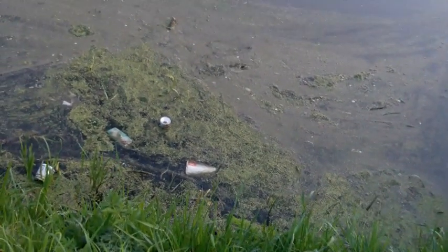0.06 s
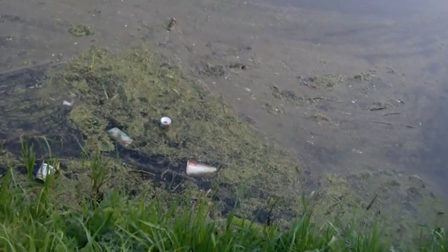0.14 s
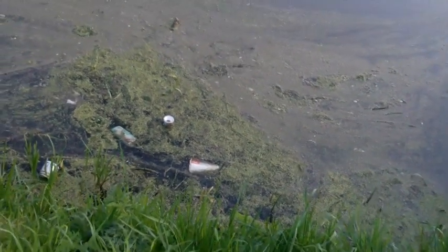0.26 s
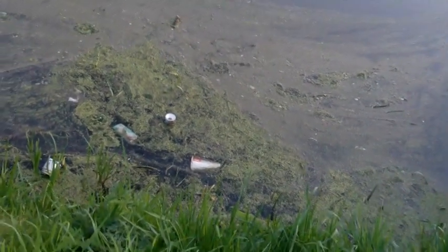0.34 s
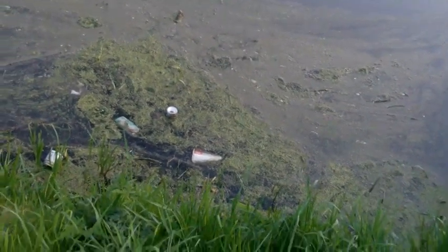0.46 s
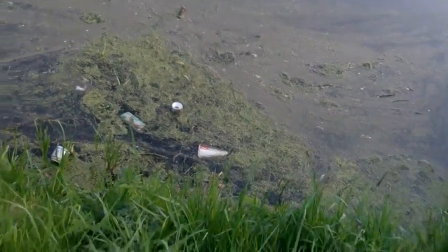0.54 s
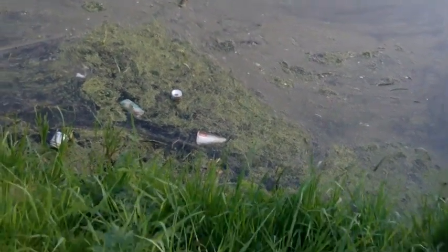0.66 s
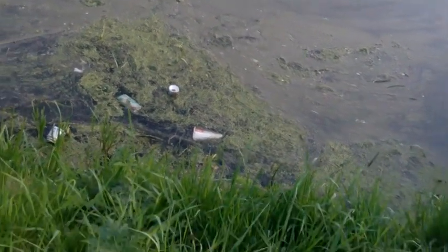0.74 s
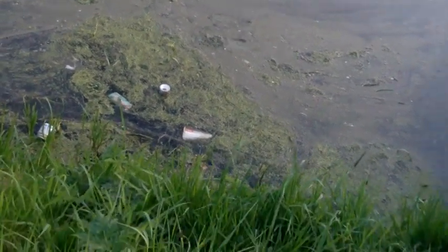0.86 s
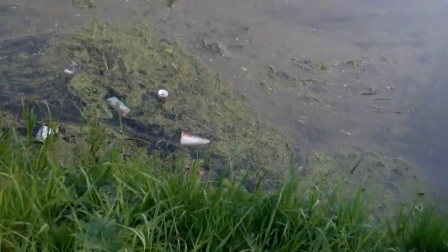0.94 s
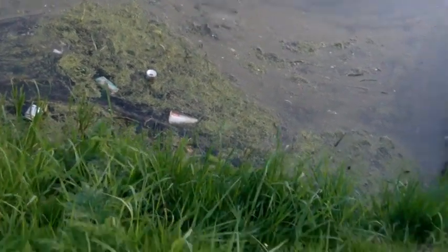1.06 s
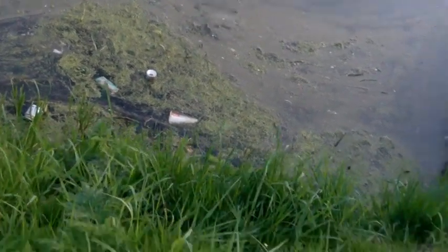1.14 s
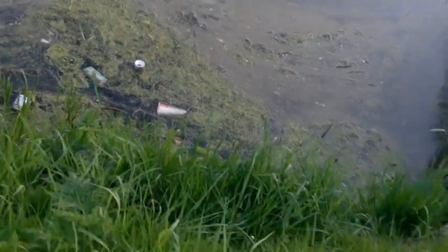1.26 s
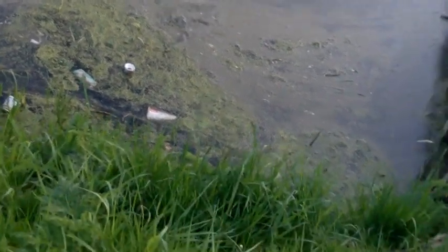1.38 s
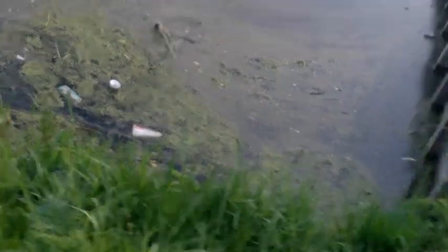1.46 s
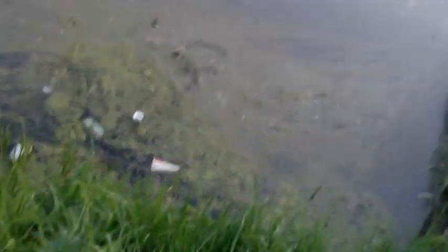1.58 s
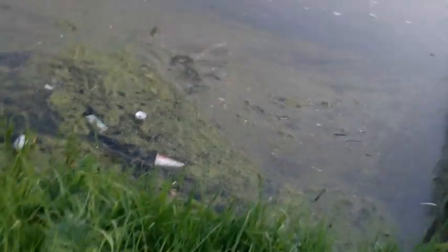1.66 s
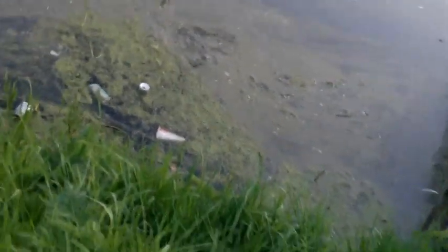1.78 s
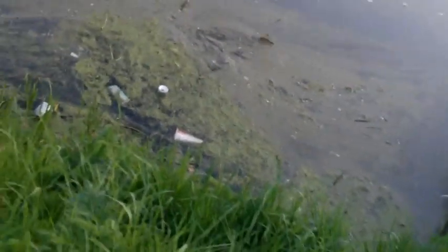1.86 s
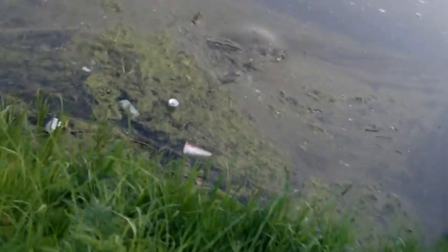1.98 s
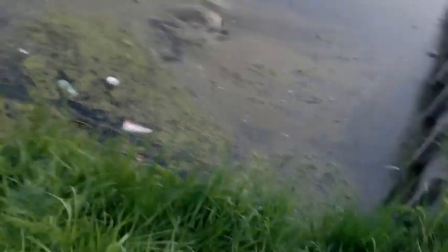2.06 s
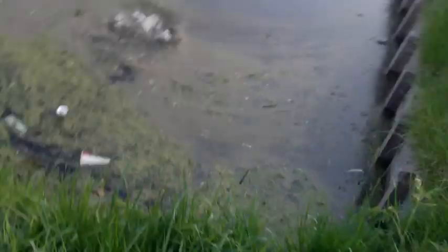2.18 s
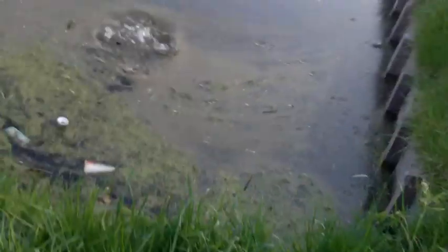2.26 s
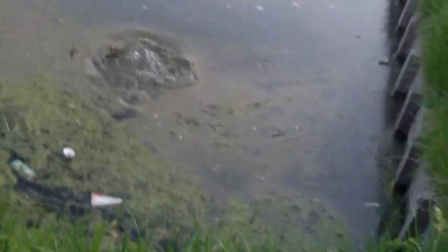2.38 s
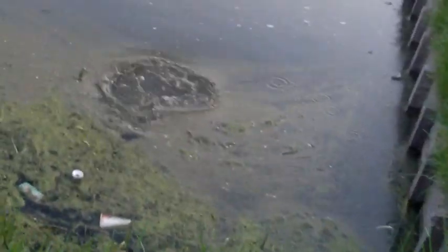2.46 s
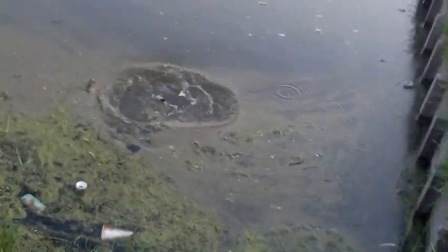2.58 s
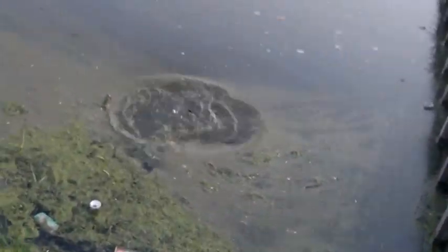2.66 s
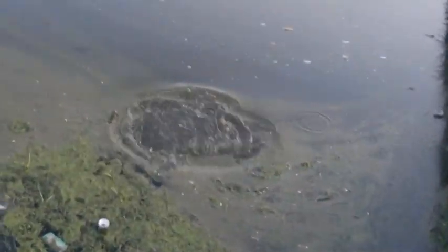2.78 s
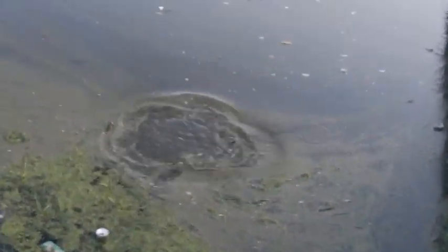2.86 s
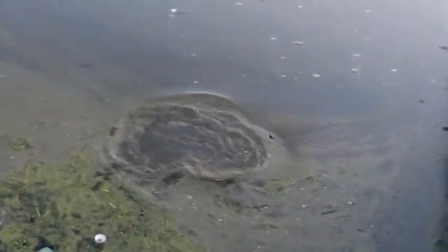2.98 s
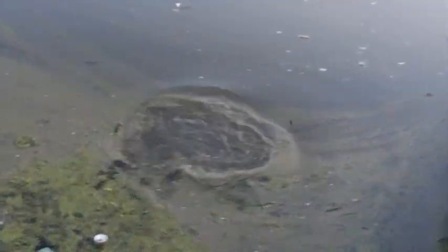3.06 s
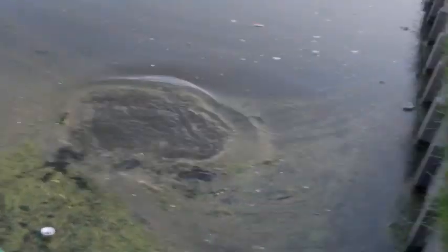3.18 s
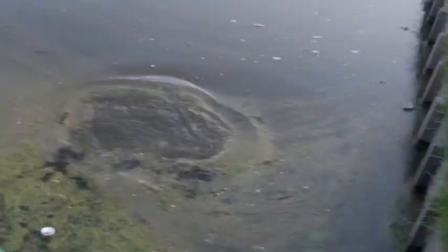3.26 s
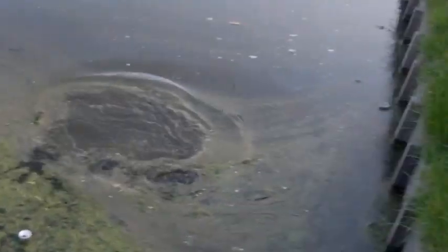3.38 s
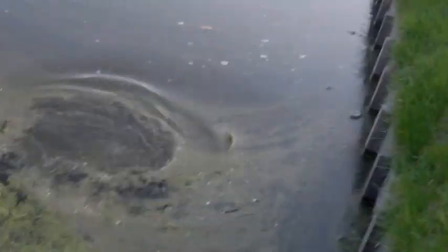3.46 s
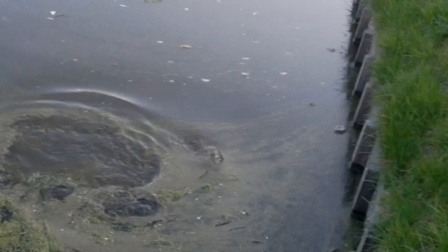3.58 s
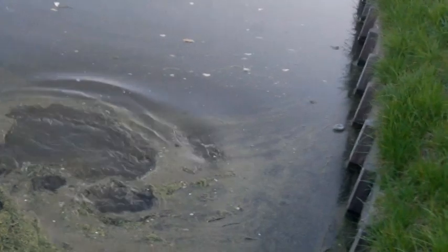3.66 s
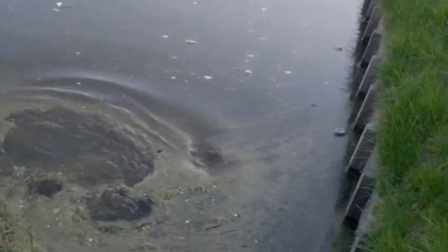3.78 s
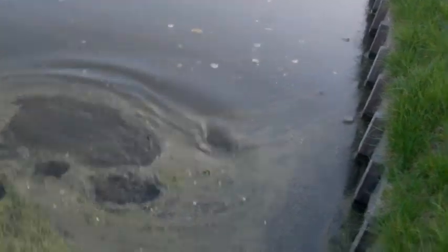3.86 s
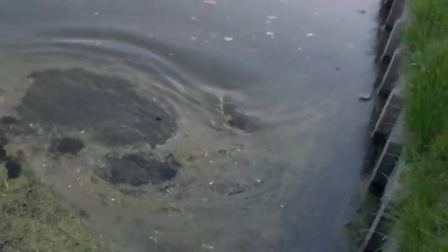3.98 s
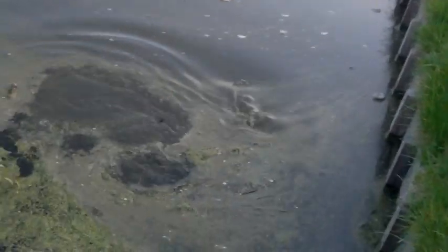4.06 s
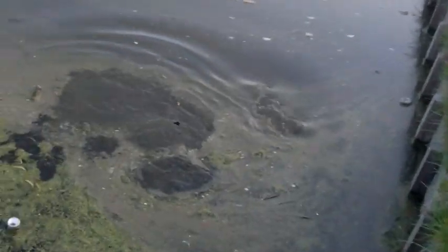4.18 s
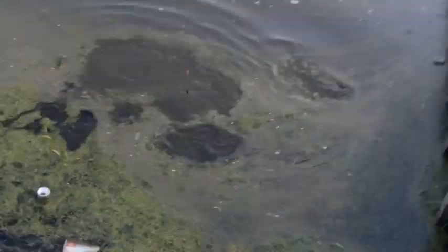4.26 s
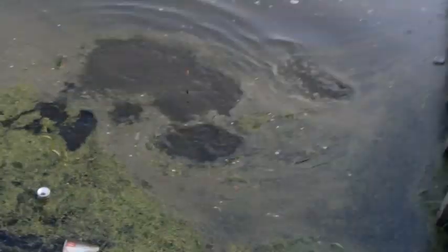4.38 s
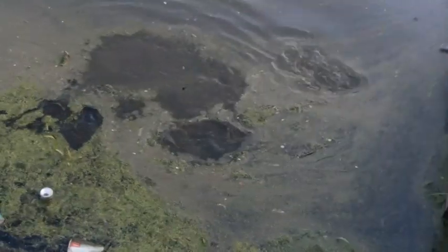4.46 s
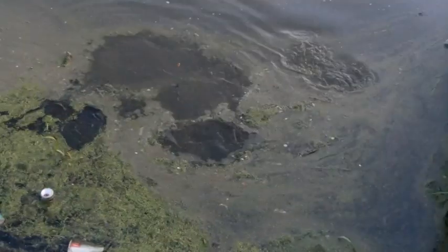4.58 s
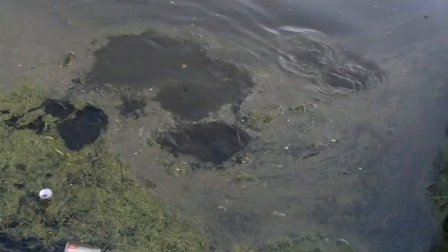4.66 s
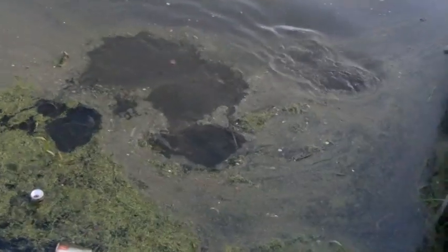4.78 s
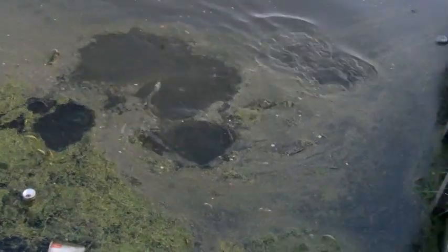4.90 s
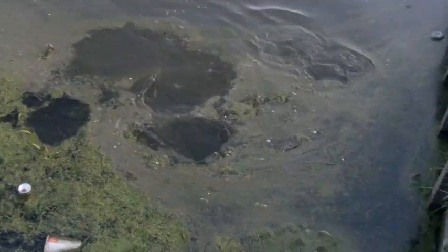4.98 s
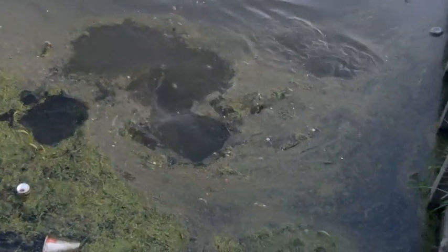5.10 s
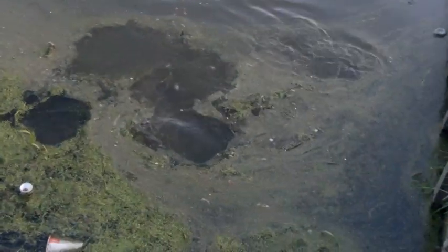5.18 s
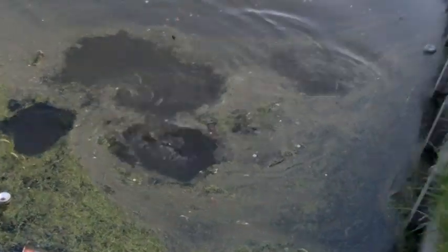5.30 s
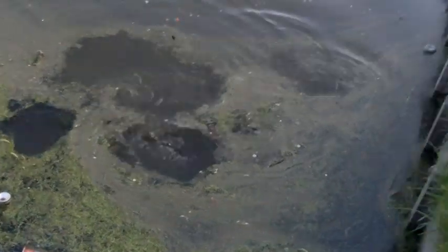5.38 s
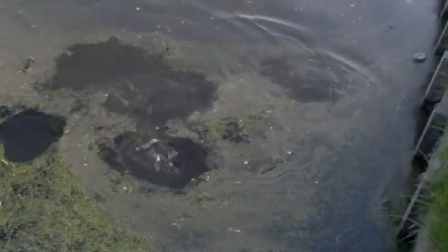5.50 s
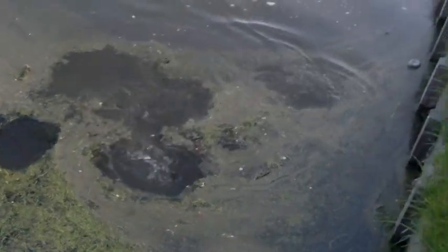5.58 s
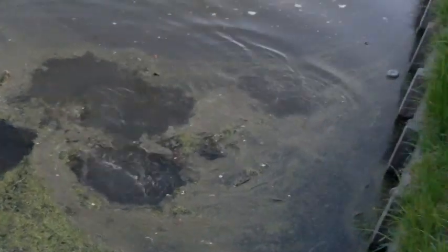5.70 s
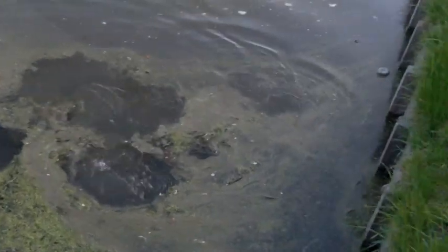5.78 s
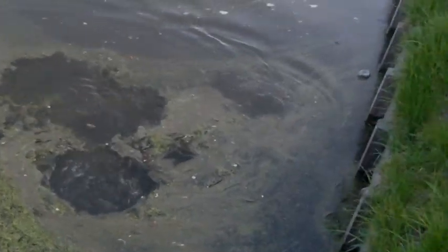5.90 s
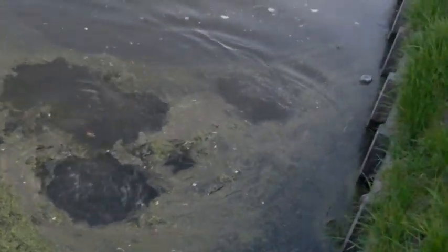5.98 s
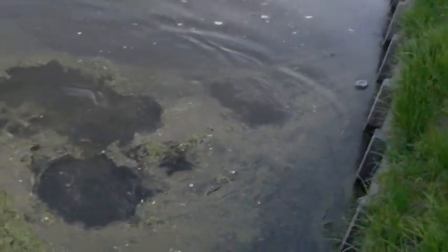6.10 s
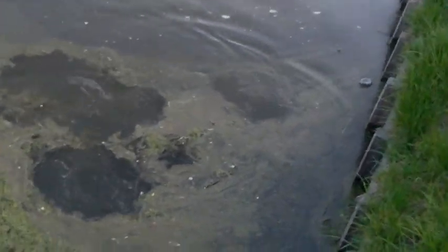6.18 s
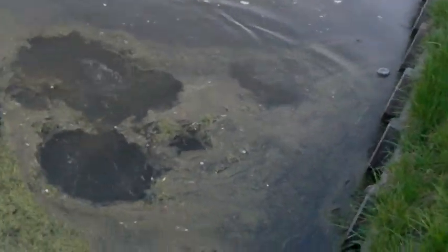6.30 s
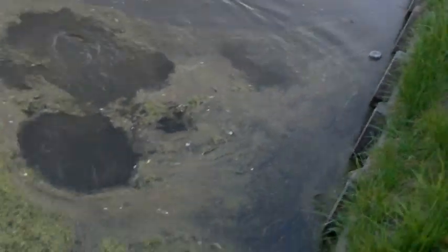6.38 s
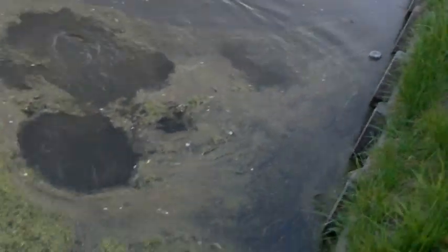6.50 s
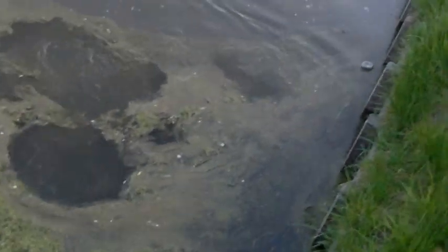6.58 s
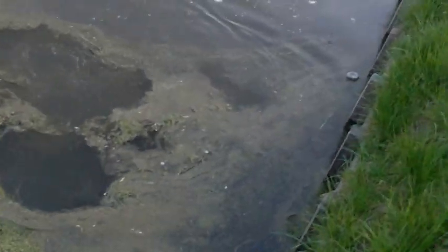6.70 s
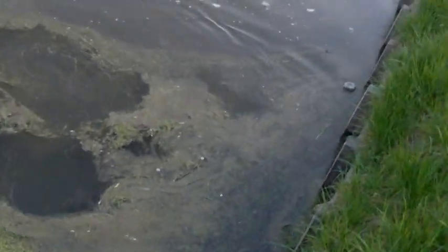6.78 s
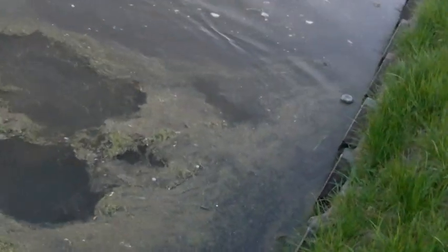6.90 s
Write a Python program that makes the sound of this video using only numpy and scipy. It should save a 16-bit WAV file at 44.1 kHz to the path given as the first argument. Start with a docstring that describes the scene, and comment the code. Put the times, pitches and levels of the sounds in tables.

```python
"""Close at a pond's edge, a hand-held camera's microphone hears steady hiss, a thin whine and lumpy rumble
of wind and grip; soon the first droplet ticks, a bubble and a knock on the housing follow.
From 1.2 s fish thrash: noise slaps ring the housing modes, and sine blips make spray, drops and bubbles.
Grass and cloth swish in strokes of filtered slips and friction, which also rub the housing; dry blades snap.
The thrashing thins after 3 s and returns weaker from 4.6 s; the last strong strokes come after 6 s."""
import sys
import numpy as np
from scipy import signal
from scipy.fft import rfft, irfft
from scipy.io import wavfile
from scipy.ndimage import uniform_filter1d

SR = 44100
rng = np.random.default_rng(int(sys.argv[2]) if len(sys.argv) > 2 else 0)


def log_audio(samples):
    """Write samples as a 16-bit WAV file to the path given in sys.argv[1]."""
    # one column per channel
    frames = np.atleast_2d(samples).T
    # limit to full scale, then quantise
    limited = np.clip(frames, -1, 1)
    pcm = np.round(limited * 32767).astype(np.int16)
    wavfile.write(sys.argv[1], SR, pcm)


def elevation(decibels):
    """Turn decibel levels (scalar or array-like) into linear amplitude ratios."""
    levels = np.asarray(decibels, float)
    return 10 ** (levels / 20)


N = 306009

# Spectrum of grass and cloth. Each row: frequency in Hz, relative density in dB per Hz.
SWISH_COLOUR = [(940, -19), (1800, -17), (3100, -3), (5330, -4.5), (6350, 0.5), (7190, -2.5), (8000, -15.5),
                (9000, -6.5), (9600, -9.5), (11100, -8.5), (14500, -22), (16200, -26)]
# Wind and the holder's grip. Each row: time in seconds, deep rumble in dB, rubbing on the housing in dB.
GRIP = [(0, -38.5, -80), (.5, -37.5, -69), (1.0, -38, -69), (1.4, -30.5, -50.5), (1.7, -27, -54),
        (1.97, -26, -56), (2.2, -27, -47.5), (2.64, -28.5, -53), (2.72, -31.5, -59), (3.2, -30, -59.5),
        (3.6, -33.5, -62.5), (4.0, -38, -52), (4.3, -35, -59), (4.5, -40, -66), (4.8, -36.5, -61.5),
        (5.3, -39.5, -63), (5.9, -36.5, -60.5), (6.3, -34.5, -59.5), (6.94, -37.5, -68)]


def evened(x):
    """Scales to rms 1."""
    return x / np.sqrt(np.mean(x ** 2) + 1e-20)


def curve(rows):
    """Columns of a table, read at every sample."""
    s, *columns = np.transpose(rows)
    return [np.interp(np.arange(N) / SR, s, c) for c in columns]


def coloured(x, points):
    """Filters x by a spectrum in dB over log frequency."""
    f, db = np.transpose(points)
    hz = np.fft.rfftfreq(len(x), 1 / SR)
    gain = elevation(np.interp(np.log(hz + 1), np.log(f + 1), db))
    return irfft(rfft(x) * gain, len(x))


def lumps(width):
    """Slow chance of rms 1, changing over about width seconds."""
    size = max(round(width * SR), 1)
    return evened(uniform_filter1d(uniform_filter1d(rng.standard_normal(N), size), size))


def resonate(x, hz, width):
    """Two-pole resonance of peak gain 1."""
    return signal.lfilter(*signal.iirpeak(hz, hz / width, SR), x)


def add(mix, s, sound):
    """Mixes a sound in at s seconds."""
    part = mix[round(s * SR):][:len(sound)]
    part += sound[:len(part)]


def blip(hz, cycles, glide):
    """A droplet's tiny air pocket: a few dying cycles that rise in pitch."""
    u = np.arange(1024) / SR * hz / cycles
    turns = cycles * (u + glide * u ** 2 / 2)
    ring = np.sqrt(u) * np.exp(-3 * u) * np.sin(2 * np.pi * turns)
    return ring / abs(ring).max()


def ticks(t60=0.012, rise=0.00041, cycles=9, glide=0.038, flat=0.041, froth=1.0, froth_cycles=90):
    """Droplets and snapping stalks: a blip with froth fizzing round its pitch, mixed with a broad bright snap."""
    # Each row: start in seconds, level in dB, strongest frequency in Hz, breadth from 0 (drop) to 1 (snap).
    tick_rows = [(0.191, -34, 3240, 0.74), (0.212, -27, 3600, 0.6), (1.3596, -26, 5200, 0.2),
                 (1.3628, -17.5, 6600, 0.2), (1.368, -21, 3700, 0.84), (1.3735, -19, 6290, 0.6),
                 (1.378, -23, 6450, 0.6), (1.396, -27.5, 6660, 0.3), (1.4635, -21, 5900, 0.63),
                 (1.4814, -25.5, 6800, 0.27), (1.49, -20, 5960, 0.85), (1.553, -17, 6700, 0.53),
                 (1.7683, -24.5, 3930, 0.43), (1.827, -27.5, 3240, 0.33), (1.8983, -20, 6800, 0.94),
                 (1.947, -24.5, 6340, 0.46), (1.995, -18, 6660, 0.56), (2.0817, -22.5, 2920, 0.6),
                 (2.091, -26.5, 2760, 0.45), (2.247, -21, 2970, 0.65), (2.3107, -28.5, 3570, 0.27),
                 (2.3908, -20.5, 6350, 0.57), (2.5414, -28.5, 3830, 0.43), (2.604, -25, 3320, 0.4),
                 (2.617, -27.5, 3550, 0.54), (2.662, -23.5, 6900, 0.5), (2.75, -27, 4660, 0.66),
                 (3.2792, -18, 6700, 0.45), (3.4337, -29, 6350, 0.8), (3.455, -23.5, 2680, 0.62),
                 (3.564, -21, 3900, 0.33), (3.822, -27.5, 3040, 0.7), (4.2798, -19, 6500, 0.58),
                 (4.2935, -22.5, 3260, 0.77), (4.7618, -30, 2480, 0.4), (4.7667, -29.5, 3800, 0.12),
                 (4.8763, -30.5, 2900, 0.63), (5.447, -37, 3170, 0.2), (5.5248, -22.5, 3430, 0.6),
                 (5.542, -29, 2500, 0.6), (5.574, -36, 2500, 0.64), (5.6255, -24.5, 3640, 0.56),
                 (5.661, -36, 3930, 0.3)]
    out, t = np.zeros(N), np.arange(1024) / SR
    shape = (1 - np.exp(-t / rise)) * elevation(-60 * t / t60)
    for (s, db, hz, broad), noise in zip(tick_rows, rng.standard_normal((len(tick_rows), 1024))):
        snap = shape * (evened(coloured(noise, SWISH_COLOUR)) + flat * np.diff(noise, prepend=0))
        fading = noise[::-1] * elevation(-60 * t * hz / froth_cycles)  # falls 60 dB in froth_cycles
        fizz = resonate(fading, hz, .3 * hz)
        drop = blip(hz, cycles, glide) + froth * fizz / abs(fizz).max()
        add(out, s, elevation(db) * ((1 - broad) * drop + broad * snap / abs(snap).max()))
    return out


def blip_shower(size, kind, blips):
    """Starts a blip of its kind wherever size is not zero."""
    out = np.zeros(N)
    for k, sound in enumerate(blips):
        out += signal.oaconvolve(size * (kind == k), sound)[:N]
    return out


def spray(over_db=2, spread_db=2.6, low_hz=2900, high_hz=7500, share=1, count=24):
    """Fish throw many small droplets of random pitch, whose level follows the swish of the moves."""
    # Fish thrashing. Each row: start in seconds, length in seconds, most drops per second before the share.
    thrashes = [(1.2, 1.9, 400), (3.1, .9, 100), (4.6, 1.4, 110)]
    t = np.arange(N) / SR
    per_s = sum(most * np.sin(np.pi * np.clip((t - s) / length, 0, 1)) ** .5 for s, length, most in thrashes)
    size = moves()[0] * elevation(over_db + spread_db * np.minimum(rng.exponential(1, N), 4))
    size *= rng.random(N) < share * per_s / SR
    kind = rng.integers(0, count, N)
    pitches = np.geomspace(low_hz, high_hz, count)
    blips = [blip(hz, 5 + 8 * u[0] ** 2, 0.25 * u[1]) for hz, u in zip(pitches, rng.random((count, 2)))]
    return blip_shower(size, kind, blips)


def housing(x):
    """The camera shell rings in a few broad modes."""
    # Each row: frequency in Hz, width in Hz of each of two passes, relative gain in dB.
    modes = [(1163, 150, 4), (1275, 108, 5.5), (1710, 290, -10), (912, 300, -8.5), (613, 230, -11.5)]
    return sum(elevation(db) * resonate(resonate(x, hz, w), hz, w) for hz, w, db in modes)


def slaps(length=0.011):
    """Slaps of water: short noise bursts heard through the housing modes."""
    # Each row: start in seconds, peak in dB.
    slap_rows = [(0.721, -45), (1.364, -33.5), (1.396, -39), (1.4783, -34.5), (1.64, -36.5), (1.671, -45),
                 (1.708, -38), (1.7374, -35), (1.825, -35), (1.858, -39), (2.011, -38.5), (2.0855, -37),
                 (2.156, -28.5), (2.199, -33), (2.2451, -33), (2.266, -35.5), (2.297, -36), (2.4224, -32.5),
                 (2.4686, -35), (2.562, -46), (2.6082, -36), (2.8354, -42), (2.9465, -35.5), (3.212, -38),
                 (3.29, -41.5), (3.4338, -40), (3.6187, -39.5), (4.0673, -34), (4.4118, -41),
                 (5.468, -42.5), (5.49, -42), (5.711, -47)]
    out, u = np.zeros(N), np.arange(4000) / SR / length
    for (s, db), noise in zip(slap_rows, rng.standard_normal((len(slap_rows), 4000))):
        slap = housing(noise * np.sqrt(u) * np.exp(-2 * u))
        add(out, s, elevation(db) * slap / abs(slap).max())
    return out


def bubbles():
    """Bubbles and a thin ring: sines, mostly gliding, that swell and die in one arch."""
    # Each row: start in seconds, peak in dB, start pitch in Hz, end pitch in Hz, length in seconds.
    bubble_rows = [(.397, -43, 720, 1450, .036), (1.47, -51, 5920, 5920, .16),
                   (1.727, -44, 1720, 1850, .034), (1.884, -44, 2300, 2900, .016),
                   (1.903, -38, 1340, 1250, .04), (1.998, -48, 5920, 5920, .025),
                   (2.086, -36, 1080, 1150, .016), (2.138, -35, 930, 1330, .022),
                   (2.154, -40, 1800, 1980, .014), (2.172, -45, 560, 720, .022),
                   (2.256, -40, 1880, 1760, .014), (2.398, -39, 2900, 2700, .011),
                   (2.853, -44, 1250, 1400, .012), (3.986, -32, 1640, 1760, .014),
                   (5.482, -50, 600, 520, .026)]
    out = np.zeros(N)
    for s, db, start_hz, end_hz, length in bubble_rows:
        u = np.arange(round(length * SR)) / (length * SR)
        turns = np.cumsum(start_hz + (end_hz - start_hz) * u) / SR
        add(out, s, elevation(db) * np.sin(np.pi * u ** 0.99) * np.sin(2 * np.pi * turns))
    return out


def knocks(thud_hz=171.2, thud_t60=0.17, edge_t60=0.067):
    """Bumps on the housing: a low damped thud of the whole body, with a dull hard edge of noise."""
    # Each row: start in seconds, thud level in dB, hard edge level in dB.
    knock_rows = [(0.711, -35.5, -56), (1.465, -30, -43.5), (1.636, -24, -46), (1.831, -24, -41),
                  (1.903, -54, -35), (2.002, -58, -46), (2.36, -29.5, -50), (2.41, -31, -60),
                  (2.462, -33, -63), (2.631, -33.5, -49), (2.949, -31.5, -39), (3.187, -29.5, -41),
                  (3.214, -38, -47), (3.438, -40, -71), (3.622, -21, -44), (3.81, -35.5, -57),
                  (4.24, -33.5, -47), (4.404, -36.5, -77), (4.44, -34.5, -65), (6.075, -39, -49.5),
                  (6.144, -36, -53), (6.603, -37.5, -64)]
    out, t = np.zeros(N), np.arange(6000) / SR
    tones = np.sin(2 * np.pi * thud_hz * t) + elevation(-60 * t / 0.13) * np.sin(2 * np.pi * 115 * t)
    thud = (1 - np.exp(-t / 0.0017)) * elevation(-60 * t / thud_t60) * tones / 1.55
    for (s, db, edge_db), noise in zip(knock_rows, rng.standard_normal((len(knock_rows), 6000))):
        edge = elevation(-60 * t / edge_t60) * evened(resonate(noise, 455, 340))
        add(out, s, elevation(db) * thud + elevation(edge_db) * edge)
    return out


def rumble(flutter_db=-23):
    """Wind and grip: lumpy deep pressure swings; a rougher flutter above grows with them."""
    # Spectra of the two. Each row: frequency in Hz, relative density in dB per Hz.
    deep_colour = [(12, -7), (25, -2.5), (40, -2.5), (52, -9.5), (70, -21), (100, -24), (200, -46),
                   (1500, -59), (5000, -78)]
    flutter_colour = [(60, -33), (100, 0), (140, 2), (185, 2), (215, -8), (300, -21), (450, -13),
                      (900, -74), (5000, -95)]
    deep_db = curve(GRIP)[0]
    deep = evened(coloured(rng.standard_normal(N), deep_colour))
    flutter = evened(coloured(rng.standard_normal(N) * elevation(4.1 * lumps(0.029)), flutter_colour))
    return elevation(deep_db) * (deep + elevation(flutter_db) * flutter)


def moves():
    """Swish level, its tilt and the rubbing level over time: strokes over the fidgeting of the grip."""
    # Strokes through grass and cloth. Each row: start in seconds, loudest moment in seconds,
    # end in seconds, peak in dB, tilt in dB per octave.
    stroke_rows = [(1.22, 1.413, 1.6, -47, -2), (1.735, 1.817, 1.97, -49.5, -3),
                   (1.896, 2.112, 2.39, -42, 4), (3.014, 3.344, 3.51, -42, 4), (3.296, 3.39, 3.55, -47, -2),
                   (3.641, 3.78, 3.8, -49.5, 3), (3.72, 3.935, 4.04, -43, -5.5),
                   (3.888, 4.086, 4.175, -34, 0.5), (4.15, 4.228, 4.2, -48, 8),
                   (5.31, 5.547, 5.71, -42, -0.5), (5.5, 5.675, 5.82, -47.5, -1.5),
                   (5.7, 5.884, 6.04, -51, 2.5), (5.946, 6.082, 6.25, -55, 1.5),
                   (6.3, 6.418, 6.53, -35, -0.6), (6.398, 6.534, 6.68, -42, -2), (6.704, 6.889, 7, -40, 3)]
    swell, stop = 1.17, 0.65  # swells gradually, stops more abruptly: powers of a straight ramp
    dulling = 1.4  # the tilt sinks by up to this many dB per octave as a stroke dies
    rest_db, rest_tilt = -64, 0.1  # faint steady rustle
    fidget_db, fidget_tilt = -0.5, -2  # rustle relative to the rubbing level
    settle_db, settle_t60, settle_tilt = -10, 2.3, -1.1  # bent blades spring back after a stroke
    stroke_rub_db = -22.5  # a stroke also rubs the housing, this far under its swish

    t, grip_db = np.arange(N) / SR, curve(GRIP)[1]
    # powers add, and each part's tilt counts by its power
    rest, fidget, strokes = elevation(rest_db) ** 2, elevation(grip_db + fidget_db) ** 2, np.zeros(N)
    tilt = rest * rest_tilt + fidget * fidget_tilt
    for start, top, end, db, slope in stroke_rows:
        shape = np.interp(t, [start, top, end], [0, 1, 0]) ** np.where(t < top, swell, stop)
        stroke = (elevation(db) * shape) ** 2
        strokes += stroke
        tilt += stroke * (slope - dulling * (1 - shape) * (t > top))
    keep = elevation(-60 / (settle_t60 * SR)) ** 2
    settle = elevation(settle_db) ** 2 * signal.lfilter([1 - keep], [1, -keep], strokes)
    power = rest + fidget + strokes + settle
    rub = elevation(grip_db) ** 2 + elevation(stroke_rub_db) ** 2 * strokes
    return np.sqrt(power), (tilt + settle * settle_tilt) / power, np.sqrt(rub)


def swish(per_s=6000, spread_db=0.5, patchy_db=1.0, smooth=0.88):
    """Thousands of tiny blade and fibre slips over smooth friction noise; the same moves rub the housing."""
    level, tilt, rubbing = moves()
    size = elevation(spread_db * np.minimum(rng.exponential(1, N), 5)) * rng.standard_normal(N)
    slips = evened(size * (rng.random(N) < per_s / SR))
    friction = smooth * rng.standard_normal(N)
    sound = evened(coloured((slips + friction) * elevation(patchy_db * lumps(.008)), SWISH_COLOUR))
    # tilt the spectrum about 5 kHz, with random patches in time and frequency
    hz, t, z = signal.stft(sound, SR, nperseg=256)
    octaves = np.log2(np.clip(hz, 1500, 15500) / 5000)[:, None]
    patches = evened(uniform_filter1d(uniform_filter1d(rng.standard_normal(z.shape), 9, 0), 6, 1))
    z = z * elevation(octaves * np.interp(t, np.arange(N) / SR, tilt) + 1.7 * patches)
    tilted = signal.istft(z, SR, nperseg=256)[1][:N]
    rub = evened(housing(rng.standard_normal(N) * elevation(3.9 * lumps(0.0061) + 1.56 * lumps(0.017))))
    return level * tilted + rubbing * rub


def crackle(per_s=45, level_db=-23, spread_db=3.5, low_hz=5500, high_hz=11500, count=12):
    """Dry blades snap now and then: faint, thin, very short ticks."""
    size = moves()[0] ** .5 * elevation(level_db + spread_db * np.minimum(rng.exponential(1, N), 3))
    size *= rng.random(N) < per_s / SR
    kind = rng.integers(0, count, N)
    return blip_shower(size, kind, [blip(hz, 5.6, 0.1) for hz in np.geomspace(low_hz, high_hz, count)])


def hiss(level_db=-54.5):
    """Steady preamp noise, alike in both channels."""
    # Each row: frequency in Hz, relative density in dB per Hz.
    hiss_colour = [(140, 0), (230, 1), (400, -3), (800, -3), (1260, -6), (1600, -8), (8000, -13.5),
                   (16000, -15)]
    return elevation(level_db) * evened(coloured(rng.standard_normal(N), hiss_colour))


def side_noise(level_db=-63):
    """Faint steady noise, opposite in left and right."""
    # Each row: frequency in Hz, relative density in dB per Hz.
    side_colour = [(60, -32), (100, -16), (295, 1.5), (970, -3), (3540, -6), (6150, -4.5), (16000, -2)]
    side = elevation(level_db) * evened(coloured(rng.standard_normal(N), side_colour))
    return np.array([side, -side])


def whine():
    """Steady sines from the camera electronics."""
    # Each row: frequency in Hz, rms level in dB.
    whine_rows = [(7882, -73), (15704, -78)]
    t = np.arange(N) / SR
    return sum(elevation(db) * np.sqrt(2) * np.sin(2 * np.pi * hz * t) for hz, db in whine_rows)


def scene():
    """Everything at the pond reaches both channels alike."""
    plops = spray(over_db=-3, low_hz=750, high_hz=2300, share=.2)  # the rarer big drops
    water = ticks() + spray() + plops + slaps() + bubbles()
    handling = knocks() + rumble() + swish() + crackle()
    mix = water + handling
    return np.array([mix, mix])


def band_limit(x):
    """A steep low-pass at the top of the band."""
    return signal.sosfilt(signal.butter(12, 16970, fs=SR, output="sos"), x)


def record(dry):
    """Adds preamp hiss, whine and faint side noise, then limits the band at 15880 Hz."""
    edge = signal.firwin(511, 15880, window=("kaiser", 7), fs=SR)
    noisy = dry + hiss() + whine() + side_noise()
    wired = signal.oaconvolve(noisy, edge[None], "same")
    return band_limit(wired)


dry = scene()
out = record(dry)
log_audio(out)
```